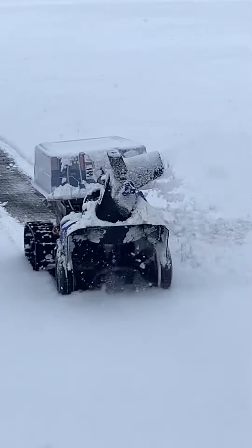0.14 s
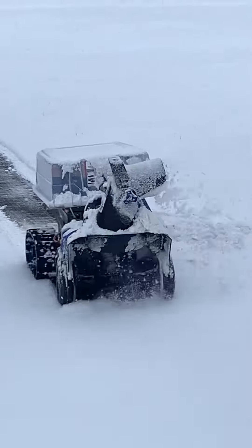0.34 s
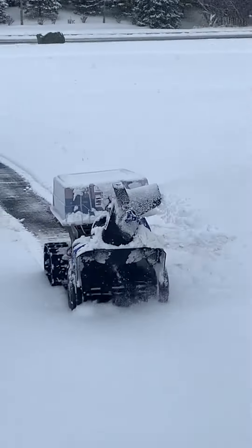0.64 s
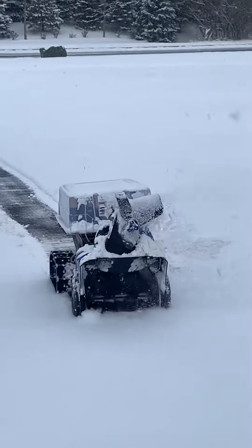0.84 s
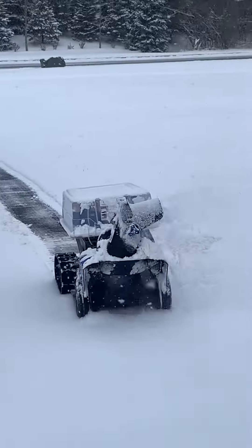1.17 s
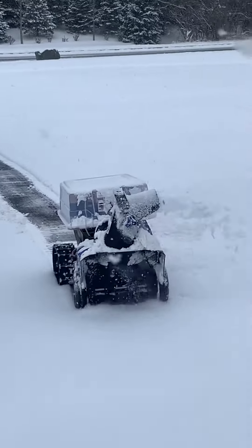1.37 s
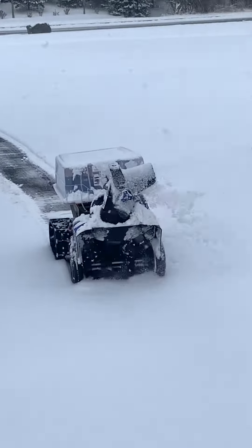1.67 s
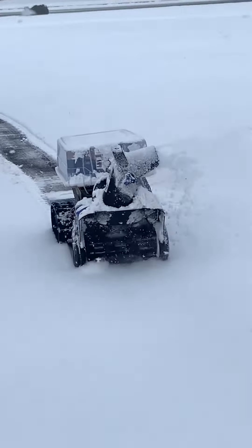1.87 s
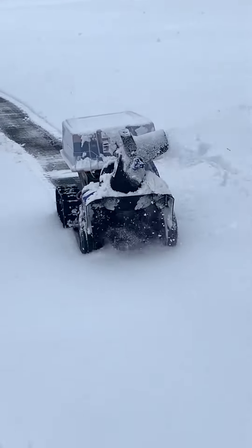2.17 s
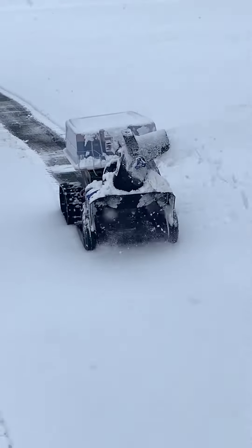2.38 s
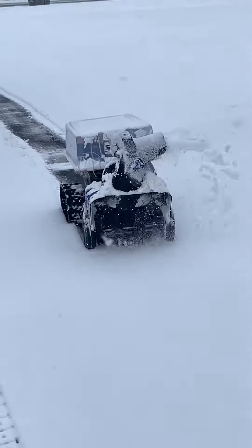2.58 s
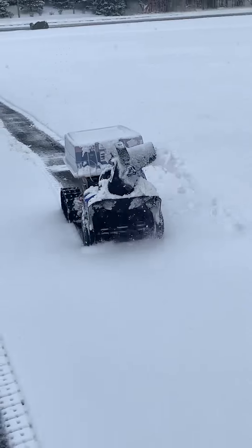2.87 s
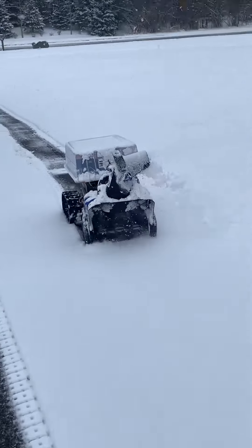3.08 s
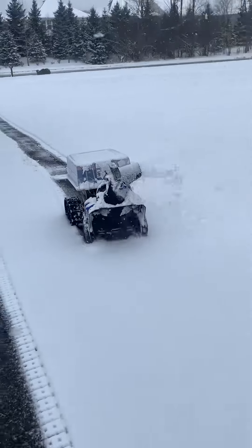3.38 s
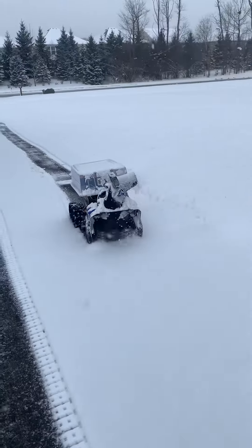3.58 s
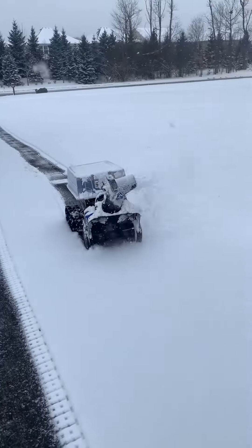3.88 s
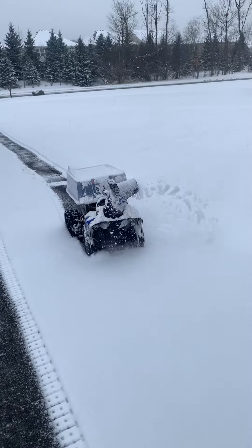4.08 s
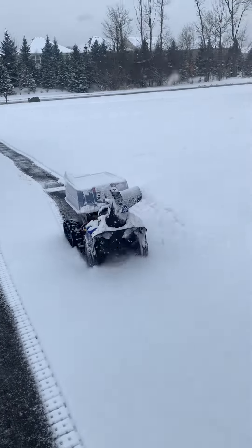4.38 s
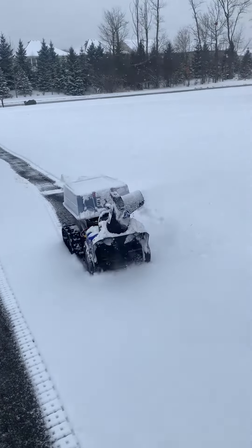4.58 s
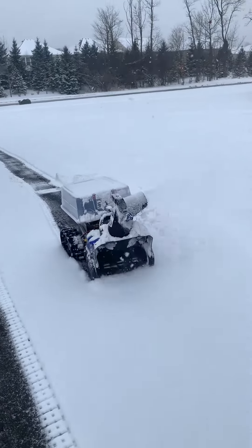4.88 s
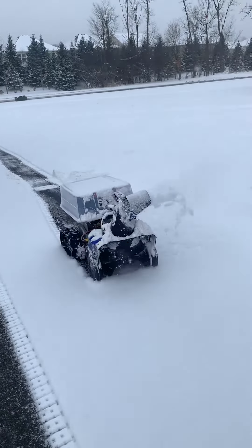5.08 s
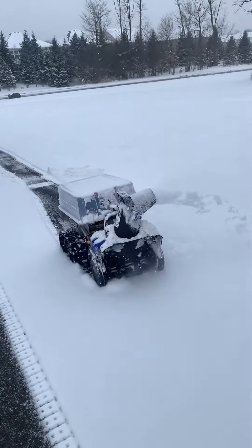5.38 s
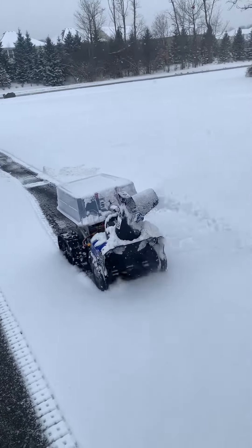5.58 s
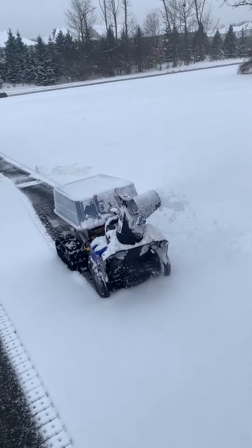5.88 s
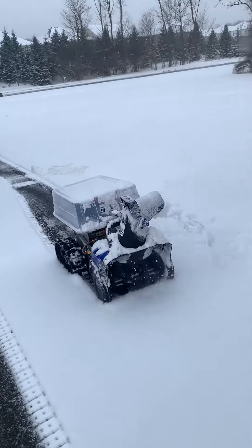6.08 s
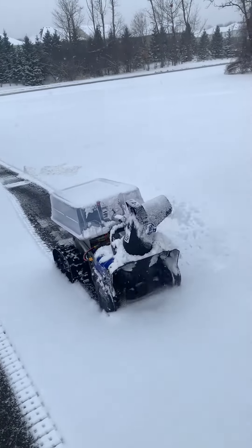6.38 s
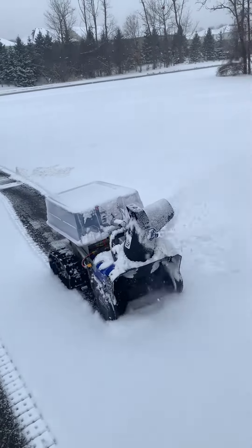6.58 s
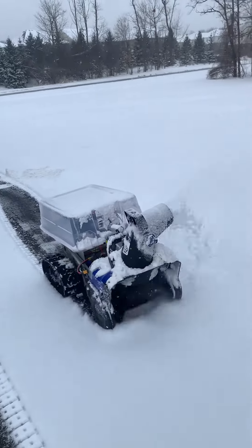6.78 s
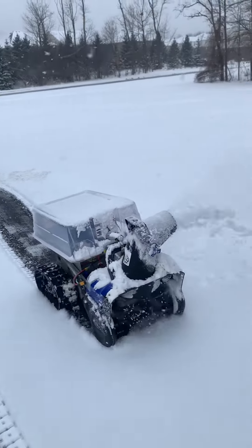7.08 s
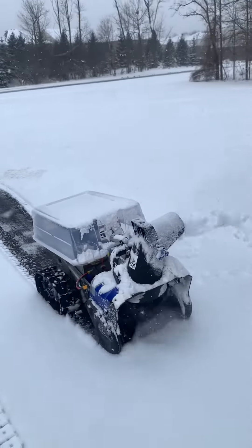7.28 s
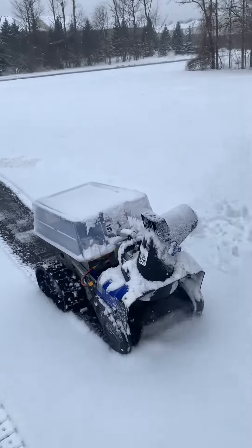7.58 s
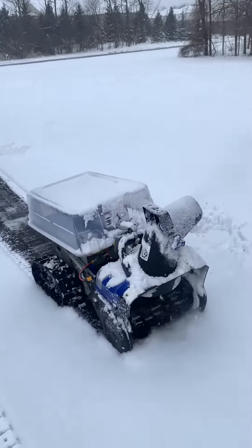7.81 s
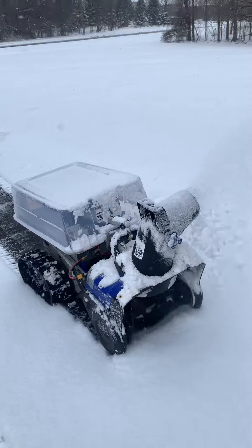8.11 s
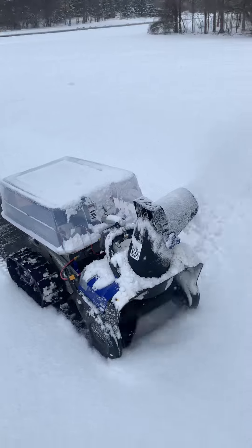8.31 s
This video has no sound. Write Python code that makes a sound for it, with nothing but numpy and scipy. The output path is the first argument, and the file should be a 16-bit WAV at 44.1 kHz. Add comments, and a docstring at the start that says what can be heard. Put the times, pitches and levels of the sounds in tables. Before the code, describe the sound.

In an open snowy area, a phone captures a compact snow-throwing machine approaching. Its housing drones, the spinning impeller chops the snow hiss into rapid pulses, and motor and gear tones sag as snow loads it, then rise again. Short dull spells interrupt the brightness early on and before five seconds. Low gust bumps and knocks hit the microphone throughout, while the sound swells and leans right by the end.

```python
"""A small electric snow blower on tracks draws nearer through fresh snow, a few metres from a phone.
Shaped noise makes the housing's drone and the thrown snow's hiss, chopped by a two-bladed impeller.
Sines locked to the shaft make motor whine, drive tones and frame hum; a whistle sits near 15 kHz.
In three spells drone and lower hiss go dull; grit ticks on the chute.
Lumpy low noise and short decaying sines are wind buffeting the two microphone ports."""
import sys
import numpy as np
from scipy import signal
from scipy.fft import rfft, irfft, next_fast_len
from scipy.io import wavfile
from scipy.ndimage import uniform_filter1d, map_coordinates

SR = 44100
rng = np.random.default_rng(int(sys.argv[2]) if len(sys.argv) > 2 else 0)


def wav_record(signal):
    """Record a signal, one row per channel, as 16-bit PCM in the file named by sys.argv[1]."""
    frames = np.transpose(np.atleast_2d(signal))
    bounded = np.clip(frames, -1, 1)
    # unit amplitude maps onto the largest positive 16-bit level
    quanta = np.round(bounded * 32767).astype(np.int16)
    wavfile.write(sys.argv[1], SR, quanta)


N = 372644
TIME_S = np.arange(N) / SR


def amp(db):
    """Decibels to gain."""
    return 10 ** (np.asarray(db) / 20)


def evened(x):
    """Scales to rms 1."""
    return x / np.sqrt(np.mean(x ** 2) + 1e-20)


def read(points, hz):
    """Reads a spectrum table on a log-frequency axis."""
    f, value = np.transpose(points)
    return np.interp(np.log(hz + 1), np.log(f + 1), value)


def curves(rows, t=TIME_S):
    """Each column of a curve table at the times t."""
    s, *columns = np.transpose(rows)
    return [np.interp(t, s, c) for c in columns]


def stretch(start, end, db, rise_db_per_s, fall_db_per_s):
    """Level sloping up to start and down from end; if start is after end the slopes overlap."""
    rise_db = rise_db_per_s * np.maximum(start - TIME_S, 0)
    fall_db = fall_db_per_s * np.maximum(TIME_S - end, 0)
    return db - rise_db - fall_db


def coloured(x, points, low_hz=0, high_hz=SR):
    """Filters by a spectrum table, between two edges; rms 1."""
    size = next_fast_len(N)
    hz = np.fft.rfftfreq(size, 1 / SR)
    gain = amp(read(points, hz)) * (hz > low_hz) * (hz < high_hz)
    return evened(irfft(rfft(x, size) * gain, size)[:N])


def wander(hz):
    """Slow random curve of rms 1, low-passed at hz."""
    return evened(signal.lfilter(*signal.butter(2, hz, fs=SR), rng.standard_normal(N)))


def tone(turns, db):
    """A sine of the given rms level."""
    return np.sqrt(2) * amp(db) * np.sin(2 * np.pi * turns)


# shaft speed, dragged down by bites of snow: t/s, f/Hz
SHAFT = [(0, 20.0), (0.24, 20.33), (0.41, 20.21), (0.5, 20.42), (0.9, 20.54), (1.02, 20.42), (1.14, 19.03),
         (1.22, 18.79), (1.48, 19.93), (1.62, 20.2), (1.85, 19.13), (2.2, 19.72), (2.48, 19.21),
         (2.82, 20.16), (3.02, 20.34), (3.27, 19.83), (3.54, 20.24), (3.85, 19.0), (4.1, 19.76),
         (4.3, 20.3), (4.7, 20.68), (4.82, 20.25), (4.98, 18.85), (5.06, 18.58), (5.28, 19.21),
         (5.51, 20.0), (5.72, 19.48), (5.94, 20.23), (6.36, 20.57), (6.64, 20.11), (6.9, 18.76),
         (7.06, 18.9), (7.26, 19.79), (7.44, 19.68), (7.66, 20.26), (8.08, 20.57), (8.45, 20.92)]


def shaft_speed():
    """Shaft turns a second: a bite of snow drags, then the speed picks up."""
    return curves(SHAFT)[0]


# machine drawing nearer, before dulling and drag:
# t/s, drone level/dB, upper hiss level/dB, lower hiss level/dB, frame hum level/dB
MACHINE = [(0, -36.5, -47, -36.5, -41.5), (0.49, -42.5, -47, -45.5, -45.5), (0.75, -44, -48, -46, -43),
           (1.0, -39.5, -45.5, -42, -42), (1.07, -39, -44, -43.5, -37), (1.4, -41, -45.5, -44, -54.5),
           (2.35, -39, -44, -46, -45), (2.58, -39.5, -44, -46.5, -48.5), (2.75, -39, -45.5, -45.5, -42),
           (3.15, -38.5, -41.5, -42, -39.5), (3.3, -38.5, -44, -45.5, -42), (3.62, -39.5, -42.5, -44, -45),
           (3.72, -37.5, -40, -43.5, -37), (3.85, -39, -42, -44, -42.5), (4.2, -38, -44.5, -44, -42),
           (4.75, -37.5, -41, -40, -34), (5.0, -35.5, -40, -41.5, -39), (5.1, -38, -40.5, -41.5, -48.5),
           (5.45, -35.5, -41, -41.5, -44), (6.28, -34.5, -40.5, -39.5, -33), (6.9, -33, -38, -39.5, -43),
           (7.3, -31.5, -38, -36.5, -45.5), (7.45, -34, -38.5, -38, -42), (8.1, -33, -38.5, -38, -43.5),
           (8.45, -32.5, -39.5, -39, -39)]


def approach():
    """Source levels over time: drone, upper hiss, lower hiss, hum."""
    return curves(MACHINE)


def chop(turns, depth, uneven, sharp):
    """Loudness over one shaft turn: a swell for each of two blades, one a little stronger."""
    burst = np.exp(sharp * (np.cos(4 * np.pi * turns) - 1))
    burst = burst * (1 + uneven * np.cos(2 * np.pi * turns))
    return 1 + depth * burst


# resonance colour of the housing: f/Hz, relative level/dB
HOUSING_COLOUR = [(150, -7.5), (300, -0.5), (450, -12.5), (600, -8), (730, 0.5), (860, -1.5), (980, 3.5),
                  (1080, 1), (1200, -6), (1450, -20), (1600, -46), (1900, -15.5), (2150, -22.5),
                  (2500, -66)]
# resonance colour of the chute: f/Hz, relative level/dB
CHUTE_COLOUR = [(900, -4), (1350, -2), (1750, 2), (2200, -3.5), (2700, -62)]
RATTLE_SHARE = 0.33  # amplitude share of the rattle in the drive


def drone(turns, level_db, chute_db):
    """Housing and chute ring with tumbling snow and the auger's rattle."""
    tumble = np.sqrt(1 - RATTLE_SHARE ** 2) * rng.standard_normal(N)
    drive = RATTLE_SHARE * rattle(turns) + tumble
    snow = drive * chop(turns, depth=0.18, uneven=0.12, sharp=16.0)
    housing = amp(level_db) * coloured(snow, HOUSING_COLOUR)
    return housing + amp(chute_db) * coloured(snow, CHUTE_COLOUR)


RENEWAL_TURNS = 3.0  # turns over which one noise pattern fades into the next


def rattle(turns):
    """Noise that nearly repeats from one shaft turn to the next."""
    patterns = rng.standard_normal((100, 512))
    position = [turns / RENEWAL_TURNS, turns % 1 * 511]
    return evened(map_coordinates(patterns, position, order=1))


# thick loads rushing up the chute: from t/s, to t/s, extra level/dB
SURGES = [(0.923, 1.193, 5.5), (7.04, 7.386, 3.5)]
SURGE_RISE_DB_PER_S, SURGE_FALL_DB_PER_S = 43, 45


def surges():
    """Extra rush in the chute, in dB."""
    return sum(np.maximum(stretch(*row, SURGE_RISE_DB_PER_S, SURGE_FALL_DB_PER_S), 0)
               for row in SURGES)


# colour of the lower hiss: f/Hz, relative level/dB
LOWER_HISS = [(1800, -8), (2400, -3), (3200, -2), (4000, -2), (5000, -0.5), (6000, -7), (7800, -9.5)]
# colour of the upper hiss: f/Hz, relative level/dB
UPPER_HISS = [(8000, 0), (9500, -4), (11000, -3.5), (13000, -4), (14500, -2.5), (15200, 0), (15800, 0)]
SPLIT_HZ = 7900


def spray(turns, upper_db, lower_db):
    """Thrown snow hisses in one burst a blade, the burst depth wandering."""
    depth = 0.47 * amp(2.2 * wander(18.0))
    snow = rng.standard_normal(N) * chop(turns, depth=depth, uneven=0.28, sharp=1.9)
    upper = amp(upper_db) * coloured(snow, UPPER_HISS, low_hz=SPLIT_HZ)
    return upper + amp(lower_db) * coloured(snow, LOWER_HISS, high_hz=SPLIT_HZ)


# spells in which drone and lower hiss go dull: from t/s, dull by t/s, clearing t/s, clear t/s,
# drone change level/dB, first hiss change level/dB, last hiss change level/dB
DULL = [(-0.1, 0, 0.2, 0.41, -8.5, -23.5, -23.5), (1.393, 1.575, 2.285, 2.315, -4, -18.5, -14),
        (4.74, 4.753, 4.97, 4.995, -8, -1.5, -17.5)]


def dullness():
    """Change of the drone and of the hiss in dB, and how far a spell has set in (0-1)."""
    spells = []
    for start, dull, clearing, clear, drone_db, first_db, last_db in DULL:
        rows = [(start, 0, 0, 0), (dull, drone_db, first_db, 1),
                (clearing, drone_db, last_db, 1), (clear, 0, 0, 0)]
        spells.append(curves(rows))
    return np.sum(spells, axis=0)


# whine at 3 times the pole rate, before the trim: t/s, level/dB
THIRD = [(0.3, -57), (0.95, -51), (1.22, -64), (1.55, -52), (1.85, -68), (2.2, -56), (2.45, -64),
         (2.7, -49), (3.25, -51), (3.55, -47), (3.8, -61), (4.0, -52), (4.68, -47), (4.95, -62),
         (5.28, -44), (5.48, -50), (5.72, -44), (6.36, -48), (6.7, -44), (7.2, -39), (7.44, -42),
         (7.9, -54), (8.45, -53)]
THIRD_TRIM_DB = -2
POLES = 21  # pole passes a shaft turn
SWITCH_HZ, SWITCH_DB = 15337, -18.5  # whistle; reference against the upper hiss


def whine(turns, upper_hiss_db):
    """Motor tones at 3 and 4 times the pole rate; switching whistle with two lower sidebands."""
    pole_turns = POLES * turns
    third_db = curves(THIRD)[0] + THIRD_TRIM_DB + 2.0 * wander(6.0)
    third = tone(3 * pole_turns + .04 * wander(12.0), third_db)
    fourth = tone(4 * pole_turns + .02 * wander(15.0), singing() + 1.2 * wander(8.0))
    switch_db = upper_hiss_db + SWITCH_DB + 2.1 * wander(9.8)
    switch_turns = SWITCH_HZ * TIME_S + .05 * wander(8.0)
    whistle = tone(switch_turns, switch_db - 3)
    near = tone(switch_turns - 2 * pole_turns, switch_db - 7 + 4.0 * wander(1.5))
    far = tone(switch_turns - 10 * pole_turns, switch_db - 12 + 4.0 * wander(1.2))
    return third + fourth + whistle + near + far


# whine at 4 times the pole rate while the shaft runs free:
# from t/s, to t/s, first level/dB, last level/dB
SINGS = [(0.2, 0.44, -54, -53), (0.47, 1.03, -47, -40), (1.42, 1.68, -58, -54), (2.8, 3.12, -47, -44),
         (3.44, 3.63, -50, -48), (4.26, 4.73, -47, -46), (5.9, 6.38, -48, -52), (6.4, 6.72, -45, -46),
         (7.2, 7.32, -46, -44), (7.56, 8.42, -41, -42)]
SING_RISE_DB_PER_S, SING_FADE_DB_PER_S, SING_FLOOR_DB = 180, 600, -72


def singing():
    """Level of the whine at 4 times the pole rate, in dB."""
    rows = []
    for start, end, first_db, last_db in SINGS:
        held_db = curves([(start, first_db), (end, last_db)])[0]
        rows.append(stretch(start, end, held_db, SING_RISE_DB_PER_S, SING_FADE_DB_PER_S))
    return np.maximum(np.max(rows, axis=0), SING_FLOOR_DB)


# drive tones, before the growth: multiple of shaft f, level/dB against the drone
GEARS = [(36, -19), (45, -13), (47, -17), (48, -10), (49, -22), (51, -14), (53, -19), (54, -24), (59, -21),
         (75, -27)]
# clearest drive tone: t/s, level/dB against the drone
MESH = [(0, -10), (0.8, -7), (1.05, -5), (1.4, -7), (1.6, -12), (4.6, -9), (4.75, -24), (4.97, -24),
        (5.03, -3), (5.25, -7), (6.5, -8), (6.8, -5), (8.45, -3)]
MESH_ORDER = 39  # multiple of shaft f
GEARS_GROW_DB_PER_S = 0.75  # stand out more as the machine nears


def gears(turns, drone_db):
    """The drive sings on multiples of the shaft speed, each tone wavering."""
    mesh_db = drone_db + curves(MESH)[0] + 1.5 * wander(5.0)
    out = tone(MESH_ORDER * turns + .02 * wander(12.0), mesh_db)
    level_db = drone_db + GEARS_GROW_DB_PER_S * TIME_S
    for order, db in GEARS:
        gear_turns = order * turns + rng.random() + .025 * wander(12.0)
        out += tone(gear_turns, level_db + db + 1.8 * wander(4.0))
    return out


# frame hum lines: multiple of shaft f, relative level/dB
HUM_ORDERS = [(8, -9), (9, -9), (10, 3), (11, -8), (12, -2.5), (14, -6), (16, -10)]
HUM_DB_PER_HZ, FREE_HZ = 7.0, 20.3  # louder under drag; shaft speed with a light load


def hum(turns, shaft_hz, level_db):
    """Low shaft orders beat together, each swelling by itself; drag on the shaft raises them."""
    lines = sum(tone(order * turns + .04 * wander(6.0), db + 3.0 * wander(8.0))
                for order, db in HUM_ORDERS)
    return amp(level_db + HUM_DB_PER_HZ * (FREE_HZ - shaft_hz)) * evened(lines)


# grit hitting the chute: t/s, nominal peak level/dB, decay t/s
TICKS = [(1.78, -46, 0.0018), (5.475, -19, 0.0038), (6.229, -24, 0.0022), (8.085, -28, 0.0022)]
# colour of the ticks: f/Hz, relative level/dB
TICK_COLOUR = [(1000, -30), (2000, 2), (5000, 0.5), (9000, 4), (16000, -9)]
TICK_CREST_DB = 6  # nominal peak over rms


def ticks():
    """Dry noise snaps that decay in milliseconds, drawn separately for each port."""
    out, t = np.zeros((2, N)), np.arange(1800) / SR
    colour = amp(read(TICK_COLOUR, np.fft.rfftfreq(len(t), 1 / SR)))
    for s, db, decay_s in TICKS:
        noise = rng.standard_normal((2, len(t)))
        snap = evened(irfft(rfft(noise) * colour)) * np.exp(-t / decay_s)
        out[:, round(s * SR):][:, :len(t)] += amp(db - TICK_CREST_DB) * snap
    return out


# gust knocks on the ports: t/s, amplitude level/dB before the envelope, first f/Hz, ring t/s
KNOCKS = [(0.108, -26, 395, 0.008), (0.123, -17, 75.4, 0.028), (0.151, -21, 910, 0.0044),
          (0.19, -20.5, 894, 0.013), (0.201, -15, 70, 0.011), (0.238, -19, 543, 0.012),
          (0.317, -23.5, 537, 0.012), (0.355, -27, 700, 0.011), (0.452, -20.5, 300, 0.014),
          (0.677, -17.5, 80, 0.017), (0.843, -25.5, 450, 0.012), (1.232, -23, 65, 0.015),
          (1.258, -17.5, 85, 0.022), (1.417, -23, 500, 0.029), (2.838, -24, 500, 0.018),
          (4.1, -17.5, 79, 0.012), (4.574, -10.5, 65, 0.016), (4.625, -10, 75, 0.026),
          (4.703, -15, 69.6, 0.013), (5.007, -22, 395, 0.0077), (5.128, -18, 65, 0.015),
          (5.167, -10.5, 80, 0.016), (5.244, -13, 91, 0.013), (5.348, -18, 80, 0.01),
          (6.872, -17, 70, 0.015), (6.955, -13, 680, 0.011), (6.98, -17, 75, 0.012),
          (7.443, -22.5, 597, 0.015), (7.907, -19, 75, 0.012), (8.2, -13.5, 59, 0.032),
          (8.284, -9, 252, 0.024)]
KNOCK_LAST_HZ, KNOCK_DROP_S, KNOCK_RISE_S = 106, 0.0048, 0.0019


def knocks():
    """Short decaying sines; those starting above the last pitch drop to it fast."""
    out, t = np.zeros(N), np.arange(2600) / SR
    for s, db, first_hz, ring_s in KNOCKS:
        last_hz = min(KNOCK_LAST_HZ, first_hz)
        glide_s = KNOCK_DROP_S * (1 - np.exp(-t / KNOCK_DROP_S))
        turns = last_hz * t + (first_hz - last_hz) * glide_s
        envelope = np.exp(-t / ring_s) * (1 - np.exp(-t / KNOCK_RISE_S))
        out[round(s * SR):][:len(t)] += amp(db) * np.sin(2 * np.pi * turns) * envelope
    return out


# colour of the wind: f/Hz, relative level/dB
GUST_COLOUR = [(30, -42), (45, -0.5), (70, 1), (120, -6.5), (200, -10.5), (400, -23.5), (800, -51),
               (1200, -90)]


def wind(level_db):
    """Lumpy low noise from turbulence at the ports."""
    lumps = rng.standard_normal(N) * amp(3.56 * wander(18.0) + 0.1 * level_db)
    low = coloured(lumps, GUST_COLOUR)
    # the gust sets the loudness, so the noise's own swells are partly flattened
    power = uniform_filter1d(low ** 2, 2600)
    return amp(level_db) * evened(low / (power + 0.044) ** 0.11)


# gusts on the ports: from t/s, to t/s, level/dB (from after to: lower peak)
GUSTS = [(0.105, 0.13, -32), (0.172, 0.22, -30), (0.252, 0.31, -27.5), (0.343, 0.38, -28),
         (0.46, 0.49, -29), (0.662, 0.69, -27.5), (0.82, 0.98, -37.5), (1.242, 1.36, -33.5),
         (1.42, 1.62, -31), (2.325, 2.17, -36), (2.73, 2.9, -31.5), (3.177, 3.35, -38), (3.57, 3.79, -34.5),
         (4.202, 4.503, -36), (4.56, 4.72, -28), (4.894, 4.91, -33.5), (5.043, 5.09, -32),
         (5.11, 5.37, -30.5), (5.463, 5.557, -32.5), (5.817, 5.802, -28.5), (5.963, 5.984, -32),
         (6.07, 6.205, -31.5), (6.513, 6.5, -31.5), (6.673, 6.756, -28.5), (6.85, 6.92, -31),
         (6.95, 6.84, -33), (7.095, 7.3, -39.5), (7.541, 7.7, -30), (7.657, 7.857, -37), (8.06, 8, -34),
         (8.19, 8.4, -28.5), (8.286, 8.1, -23.5)]
GUST_RISE_DB_PER_S, GUST_FALL_DB_PER_S = 244, 186


def gusting(lull_db):
    """Level of the wind in dB: the gusts rise out of a lull."""
    rows = [stretch(*row, GUST_RISE_DB_PER_S, GUST_FALL_DB_PER_S) for row in GUSTS]
    return np.maximum(np.max(rows, axis=0), lull_db)


# t/s, left shading level/dB, f/Hz under which the channels are alike,
# position (0 ahead, 1 right, 2 or more close on the right)
STEREO = [(0, -10.5, 830, 0), (2, -4.5, 790, 0.16), (3.7, -7.5, 721.1, 0.08), (4.1, -2.5, 695, 0.47),
          (4.3, -8, 660, 0.5), (4.7, -7.5, 565, 1.3), (5.1, -6.5, 358, 1.03), (6.8, -7.5, 354, 1.2),
          (7.2, -8.5, 274, 2), (7.6, -10.5, 198.7, 1.3), (8, -7.5, 109, 2), (8.45, -11, 60, 6)]
# share of the shading, machine ahead: f/Hz, share
SHADE_AHEAD = [(700, 0.31), (860, 0.23), (1100, 0.85), (1290, 0.97), (1400, 0.021), (1800, 0.4),
               (2000, 0.2), (2300, 0.18), (3300, 0)]
# share of the shading, machine to the right: f/Hz, share
SHADE_RIGHT = [(650, 0), (860, 0.63), (1100, 0.69), (1250, 1), (1600, 0.9), (1800, 0.65), (2000, 1),
               (2200, 0.28), (3300, 0)]
# left loss while the chute points right: f/Hz, loss/dB per dB of surge
SURGE_SHADE = [(800, 0), (1200, 1.5), (1700, 2), (2200, 2), (3000, 0)]
# phase lead of the left port, low part, machine ahead: f/Hz, lead/rad
LEAD_AHEAD = [(800, 0.15), (950, -0.3), (1050, -0.8), (1130, -0.4), (1200, 1.2), (1380, 2.3), (1470, 2.2),
              (1640, 1.4), (1800, 1.4), (2300, 2.6)]
# same, machine to the right: f/Hz, lead/rad
LEAD_RIGHT = [(350, -0.5), (520, -0.75), (600, -0.15), (775, 1.5), (860, 3), (950, 3.9), (1050, 4.3),
              (1130, 4), (1200, 2.8), (1350, 2.9), (1640, 1.4), (1800, 1.3), (2000, 2.4), (2300, 3)]
# same, machine close on the right: f/Hz, lead/rad
LEAD_CLOSE = [(180, 0.2), (300, -2.5), (430, -1.4), (690, -2.3), (1380, -2.3), (1640, 0.5), (1800, 0.6),
              (2000, 3.5), (2300, 3.6)]
# same, high part, any position: f/Hz, lead/rad
LEAD_HIGH = [(2300, 2.8), (2760, 1.9), (3500, 1.5), (4390, 3.08), (5080, 3.2), (6370, 6.2), (7490, 6.4),
             (8350, 9.35), (9560, 9.5), (10400, 12.5), (11600, 12.6), (12500, 15.65), (13700, 15.76),
             (14600, 18.7), (16600, 18.9)]
# colour of the dull spells: f/Hz, level/dB
HOLLOW = [(450, 1.5), (600, -5), (900, -1), (1350, 1), (1600, -4), (2000, -1.5), (3000, 2), (4000, 0),
          (7500, -2), (7900, 0.5)]
DULL_EVENS = 0.66  # share of the left shading that goes in a dull spell


def ports(x, spread, aimed):
    """Two ports: path difference and shading by the phone, fading out under a moving edge."""
    hz, t, z = signal.stft(x, SR, nperseg=1024, noverlap=768)
    f = hz[:, None]
    drift = uniform_filter1d(rng.standard_normal(z.shape), size=24, axis=1)
    drift = evened(uniform_filter1d(drift, size=3, axis=0))
    shade_db, alike_hz, position = curves(STEREO, t)
    close, right = np.clip(position - 1, 0, 1), np.clip(position, 0, 1)
    apart = 1 / (1 + (alike_hz / (f + 1)) ** 12)

    # phase lead: blend the positions as unit vectors
    lead_ahead, lead_right, lead_close, lead_high = (
        np.interp(hz, *np.transpose(table))[:, None]
        for table in (LEAD_AHEAD, LEAD_RIGHT, LEAD_CLOSE, LEAD_HIGH))
    blend = (1 - right) * np.exp(1j * lead_ahead)
    blend = blend + (right - close) * np.exp(1j * lead_right) + close * np.exp(1j * lead_close)
    lead = aimed * np.where(f < LEAD_HIGH[0][0], apart * np.angle(blend), lead_high)
    lead += apart * read(spread, hz)[:, None] * drift

    # shading of the left port, colour of the dull spells on both
    share = (1 - right) * read(SHADE_AHEAD, hz)[:, None] + right * read(SHADE_RIGHT, hz)[:, None]
    surge_loss_db = read(SURGE_SHADE, hz)[:, None] * np.interp(t, TIME_S, surges())
    dull = aimed * np.interp(t, TIME_S, dullness()[2])
    z = z * amp(read(HOLLOW, hz)[:, None] * dull)
    left_db = share * shade_db * apart * (1 - DULL_EVENS * dull) - surge_loss_db
    left = z * np.exp(1j * lead) * amp(left_db)
    return signal.istft(np.array([left, z]), SR, nperseg=1024, noverlap=768)[1][:, :N]


# phase drift of the machine's noise between the ports: f/Hz, drift/rad
DRIFT = [(100, 0.35), (300, 0.71), (500, 0.28), (850, 0.5), (1000, 0.39), (1130, 1.83), (1300, 0.71),
         (2000, 0.43), (3800, 0.75), (4400, 0.15)]
CHUTE_DB, LULL_DB = -6, -41  # chute against the clear drone; wind between gusts, clear
CHUTE_DULLS, HUM_DULLS, WIND_DULLS = 0.48, 0.9, 0.3  # share of hiss, drone, hiss change


def scene():
    """Machine noise drifts in phase between the ports, tones do not; wind has no aimed lead."""
    shaft_hz = shaft_speed()
    turns = np.cumsum(shaft_hz) / SR
    clear_db, upper_db, lower_db, frame_db = approach()
    drone_change_db, hiss_change_db, _ = dullness()

    drone_db = clear_db + drone_change_db
    chute_db = clear_db + CHUTE_DB + CHUTE_DULLS * hiss_change_db + surges()
    noise = drone(turns, drone_db, chute_db)
    noise += spray(turns, upper_db, lower_db + hiss_change_db)
    noise += hum(turns, shaft_hz, frame_db + HUM_DULLS * drone_change_db)
    tones = whine(turns, upper_db) + gears(turns, drone_db)
    machine = ports(noise, DRIFT, aimed=True) + ports(tones, [(1000, 0)], aimed=True)

    air = wind(gusting(LULL_DB + WIND_DULLS * hiss_change_db)) + knocks()
    return machine + ticks() + ports(air, [(65, 0.3), (125, 1.1)], aimed=False)


EDGE_HZ = 15750


def record(dry):
    """Band limit: linear-phase low-pass."""
    taps = signal.firwin(1023, EDGE_HZ, window=("kaiser", 5), fs=SR)
    return signal.oaconvolve(dry, taps[None], "same")


dry = scene()
out = record(dry)
wav_record(out)
```